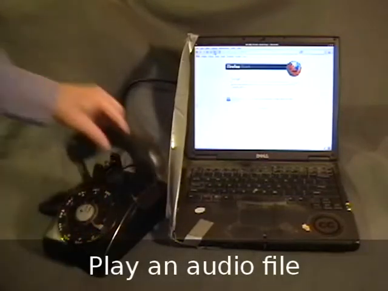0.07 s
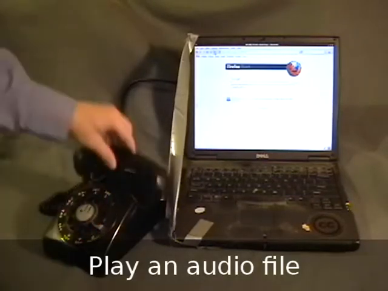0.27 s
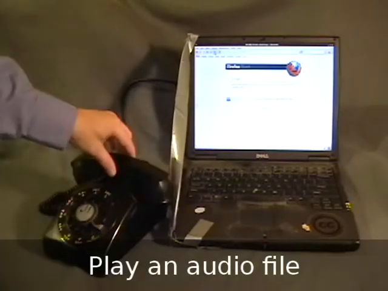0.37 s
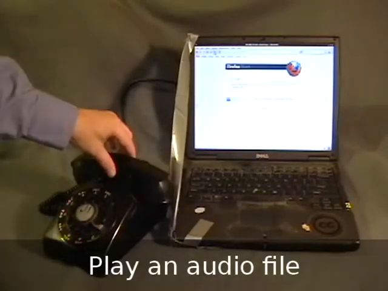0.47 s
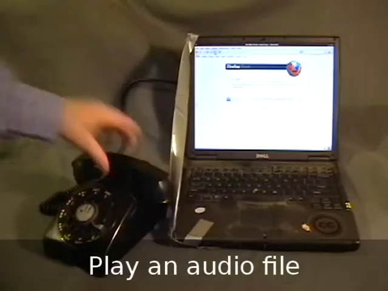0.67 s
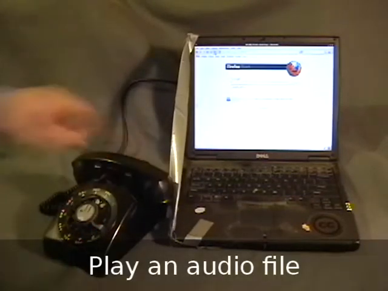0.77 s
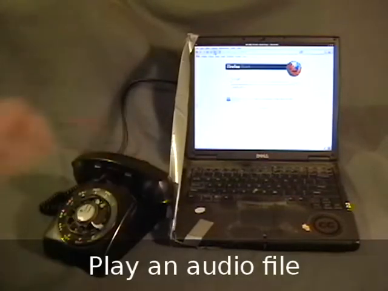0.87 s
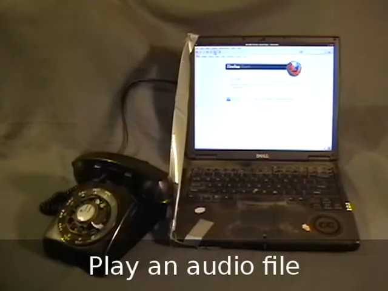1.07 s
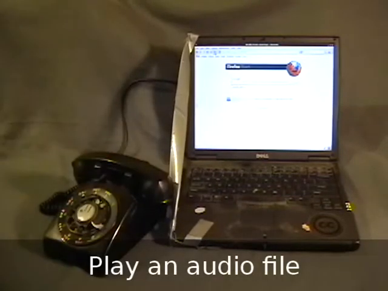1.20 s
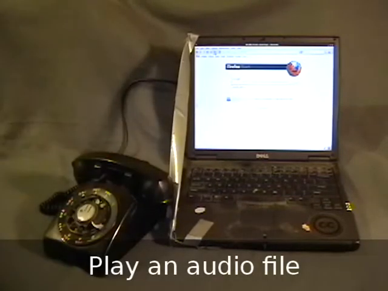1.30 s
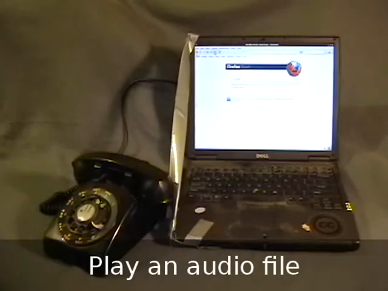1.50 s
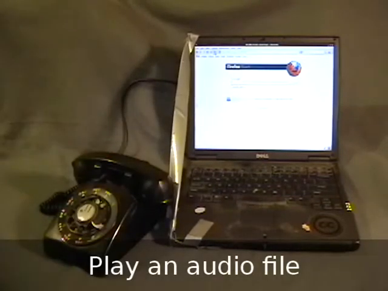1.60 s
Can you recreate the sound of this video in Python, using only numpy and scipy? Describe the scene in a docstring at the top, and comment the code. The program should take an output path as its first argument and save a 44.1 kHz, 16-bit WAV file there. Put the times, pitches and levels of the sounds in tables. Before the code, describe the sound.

A plastic telephone handset is hung up with two sharp, hollow clacks.

```python
"""A laptop fan whirs faintly in a quiet room, and a hand rustles as it lowers a plastic handset onto a
rotary desk telephone. One end lands, then the other: two hollow clacks, each a sharp crack that sets the
plastic ringing and thuds into the table, with small ticks between. The handset rocks into its seat with
soft knocks. Last, the fingers slide off it with a few slips and a tiny squeak, while the fan whirs on."""
import sys
import numpy as np
from scipy import signal
from scipy.fft import rfft, irfft
from scipy.io import wavfile
from scipy.ndimage import uniform_filter1d

SR = 44100
rng = np.random.default_rng(int(sys.argv[2]) if len(sys.argv) > 2 else 0)


def waveform_to_disk(signal):
    """Save audio, clipped to [-1, 1], as 16-bit WAV at the path in sys.argv[1]."""
    frames = np.transpose(np.atleast_2d(signal))
    scaled = np.clip(frames, -1, 1) * 32767
    samples = np.round(scaled).astype(np.int16)
    wavfile.write(sys.argv[1], SR, samples)


N = 72765
TIME = np.arange(N) / SR


def amp(db):
    """Turns decibels into a factor to multiply by."""
    return 10 ** (np.asarray(db) / 20)


def unit(x):
    """Scales a sound to an energy of one."""
    return x / np.sqrt(np.sum(x ** 2) + 1e-20)


def look_up(table, hz):
    """Reads between the rows of a table, along a logarithmic frequency axis."""
    row_hz, value = np.transpose(table)
    return np.interp(np.log(hz + 1), np.log(row_hz + 1), value)


def fade(t, fade_s):
    """Dies away. A fade time is always the time taken to fall by 60 dB."""
    return np.exp(-np.log(1000) * t / fade_s)


def add(mix, start_s, sound):
    """Mixes a sound in at its start time."""
    part = mix[:, round(start_s * SR):][:, :sound.shape[-1]]
    part += sound[..., :part.shape[1]]


def cut_bass(x, hz, order):
    """Weakens what lies below hz; a higher order cuts more steeply."""
    return signal.sosfilt(signal.butter(order, hz, "high", fs=SR, output="sos"), x)


def coloured(x, colour, tilt_db=0, size=4096):
    """Gives a sound a colour, its balance of low and high. A tilt above zero brightens it."""
    hz = abs(np.fft.fftfreq(size, 1 / SR))
    octaves = np.log2(np.maximum(hz, 300) / 1000)
    log_gain = np.log(amp(look_up(colour, hz) + tilt_db * octaves))
    response = np.exp(np.conj(signal.hilbert(log_gain)))  # nothing sounds ahead of the hit
    taps = np.fft.ifft(response).real[:size // 2]
    return signal.fftconvolve(np.atleast_2d(x), unit(taps)[None], axes=1)[:, :x.shape[-1]]


def stereo_noise(width):
    """Hiss for two channels; the smaller the width, the more alike they are."""
    mid, side = rng.standard_normal((2, N))
    return np.array([mid + width * side, mid - width * side])


def wobble(samples):
    """A random drift of about one either way, slower when smoothed over more samples."""
    return np.sqrt(N) * unit(uniform_filter1d(rng.standard_normal(N), size=samples))


# The rush of room air and fan. Each row: frequency in Hz, relative level in dB.
AIR_COLOUR = [(15, -33), (25, -20), (77, -9), (114, -3), (263, -5), (300, -11), (380, -2.5), (593, -8.5),
              (812, -4), (878, -10.5), (1480, -16.5), (1980, -15.5), (3250, -22), (10600, -32.5),
              (12500, -66)]
# How alike the air sounds left and right. Each row: frequency in Hz, likeness from 0 to 1.
AIR_LIKENESS = [(30, 0.3), (120, 0), (800, 0), (3000, 0.38), (10000, 0.94)]
# The fan's tones and hum. Each row: pitch in Hz, level in dB.
FAN_TONES = [(118.4, -73.5), (400, -77.5), (759, -72), (823.6, -76), (1949, -83)]


def fan_and_air(air_db=-57.5, wander_hz=3.54):
    """Air rushes steadily under the wavering tones of a small fan."""
    hz = np.fft.rfftfreq(N, 1 / SR)
    left, other = rfft(rng.standard_normal((2, N)))
    likeness = np.clip(look_up(AIR_LIKENESS, hz), 0, 1)
    right = likeness * left + np.sqrt(1 - likeness ** 2) * other
    rush = irfft(np.array([left, right]) * amp(look_up(AIR_COLOUR, hz)), N)
    out = amp(air_db) * np.sqrt(2 * N) * unit(rush)
    for tone_hz, db in FAN_TONES:
        pitch_hz = tone_hz + wander_hz * wobble(3000)
        out += amp(db) * np.sqrt(2) * np.sin(2 * np.pi * np.cumsum(pitch_hz) / SR)
    return out


# How the rustle of the hand swells and sinks. Each row: time in seconds, level in dB.
RUSTLE_LEVELS = [(0, -63.5), (0.058, -61), (0.11, -64.5), (0.6, -66.5), (0.7, -73), (0.915, -68),
                 (0.93, -61), (0.975, -58), (1.005, -55.5), (1.04, -58), (1.1, -67), (1.25, -72)]
# The colour of rubbing. Each row: frequency in Hz, relative level in dB.
RUB_COLOUR = [(150, -12.5), (420, -3.5), (650, 1.5), (900, -2.5), (1400, -1.5), (1680, 1.5), (2000, -4.5),
              (4500, -7.5), (10000, -11.5), (13000, -24.5)]


def hand_rustle():
    """Sleeve and skin rub as the hand moves, loudest as it slides off the plastic."""
    times, levels_db = np.transpose(RUSTLE_LEVELS)
    loudness = amp(np.interp(TIME, times, levels_db, -np.inf, -np.inf))
    return coloured(stereo_noise(width=0.27), RUB_COLOUR) * loudness


def crack(fade_s, rise_s=0.00076, size=4096):
    """A hit wakes many short vibrations in a plastic shell, heard as one sharp burst."""
    t = TIME[:size]
    shape = fade(t, fade_s)
    burst = rng.standard_normal(size) * shape
    for _ in range(3):  # even out the frequencies while keeping the burst short
        spectrum = rfft(burst)
        burst = irfft(spectrum / (abs(spectrum) + 1e-9)) * np.minimum(1, 10 * shape)
    return np.pad(unit(burst * np.minimum(t / rise_s, 1)), (0, N - size))


# Echoes of the crack. Each row: delay in seconds, level in dB compared with the crack.
NEAR_ECHOES = [(0.0032, -30.5), (0.0062, -9), (0.0148, -12.5)]


def echoed(x):
    """The sound bounces off the laptop and the wall close by."""
    out = x.copy()
    for delay_s, db in NEAR_ECHOES:
        add(out, delay_s, amp(db) * x)
    return out


# How long the dense ring lasts. Each row: frequency in Hz, fade time in seconds before stretching.
RING_FADES = [(100, 0.65), (450, .19), (1400, 0.18), (3500, 0.22), (8000, 0.12)]


def dense_ring(stretch, rise_s=0.0062):
    """Housing and nearby surfaces ring at so many pitches that they blur; the treble dies first."""
    hz, t, spectrum = signal.stft(stereo_noise(width=0.15), SR, nperseg=256)
    fade_s = stretch * look_up(RING_FADES, hz)[:, None]
    _, tail = signal.istft(spectrum * fade(t, fade_s), SR, nperseg=256)
    tail = cut_bass(tail[:, :N], hz=220, order=1)
    swell = (1 - np.exp(-TIME / rise_s)) ** 2
    return np.sqrt(2) * unit(tail * swell)


def struck(tones, rise_s, opposed=False):
    """A push starts all of an object's own tones at once; if opposed, every other one is flipped."""
    out = np.zeros((2, N))
    for k, (hz, db, fade_s) in enumerate(tones):
        skew = 0.15 * rng.standard_normal() * np.array([[1], [-1]])  # left and right slightly out of step
        sign = (-1) ** (k * opposed)
        out += sign * amp(db) * fade(TIME, fade_s) * np.sin(2 * np.pi * hz * TIME + skew)
    return out * np.minimum(TIME / rise_s, 1)


# The tones of the hollow handset and housing. Each row: pitch in Hz, fade time in seconds without
# the hand's grip, then a level in dB for each kind of blow: first landing, second landing, settling.
HOLLOW_TONES = [(228, .13, -26.5, -37, -39.5), (281.8, .3, -51.5, -38, -55), (338, 0.45, -47, -37.5, -54.5),
                (384.3, 0.22, -25, -18, -43.5), (449.9, 0.15, -24, -15, -39),
                (508.3, 0.17, -20.5, -20, -44), (626, 0.12, -25, -46, -46.5),
                (730, 0.03, -11.5, -16.5, -37), (867, 0.041, -18.5, -21.5, -59),
                (1021, 0.15, -33.5, -22.5, -50.5), (1066, 0.22, -33, -35.5, -54),
                (1130, 0.15, -44, -30.5, -57), (1420, 0.057, -20.5, -23.5, -64),
                (1724, 0.16, -33, -39.5, -50.5), (1935, 0.064, -30, -27.5, -63),
                (2075, 0.12, -46, -28.5, -75), (3218, 0.042, -18, -20, -63), (3443, 0.088, -29.5, -34, -60)]
# So small a body gives off little bass. One limit in Hz for each kind of blow, in the same order.
BASS_LIMITS_HZ = [199, 283, 190]
SECOND_LANDING, SETTLING = 1, 2
HARD_RISE_S, GRIP_S = 0.00073, 0.12


def hollow_body(blow, rise_s, favoured_hz=450, fall_db=0):
    """The hollow telephone rings with tones that depend on where it is hit; the hand chokes them."""
    tones = [(hz, levels[blow] - fall_db * abs(np.log2(hz / favoured_hz)), fade_s)
             for hz, fade_s, *levels in HOLLOW_TONES]
    grip = np.exp(-(TIME / GRIP_S) ** 2)
    ringing = struck(tones, rise_s, opposed=blow != SECOND_LANDING)
    return cut_bass(ringing * grip, BASS_LIMITS_HZ[blow], order=3)


# The two ends landing. Each row: start in seconds, crack level in dB, crack fade time in seconds,
# dense ring level in dB, stretch factor for the ring's fade time, left minus right in dB.
LANDINGS = [(0.2026, 5.5, 0.018, 3, 0.96, 0.5), (0.3001, 8.5, 0.02, 3.5, 0.85, 0)]
# One list for the colour of each landing. Each row: frequency in Hz, relative level in dB.
LANDING_COLOURS = [
    [(50, -41), (150, -41), (230, -23), (330, -12), (520, 4), (800, -3.5), (1100, -3.5), (1450, -6.5),
     (2650, -6), (3300, -11), (5200, -7), (5900, -24), (6700, -8), (8300, -10.5), (9100, -8),
     (10300, -19.5), (13000, -71.5)],
    [(50, -60.5), (170, -24), (290, -16.5), (470, 3.5), (600, -10), (950, -2.5), (1350, -9), (1950, -5.5),
     (2500, -16), (3400, -13.5), (4300, -19), (5200, -17.5), (5700, -23.5), (6800, -17.5), (7600, -31),
     (9000, -20.5), (10200, -97)],
]


def clacks():
    """Each end of the handset hits the cradle: a crack, a dense ring and hollow tones."""
    out = np.zeros((2, N))
    for blow, (start_s, crack_db, fade_s, ring_db, stretch, left_db) in enumerate(LANDINGS):
        snap = amp(crack_db) * echoed(crack(fade_s)[None])
        shell = coloured(snap + amp(ring_db) * dense_ring(stretch), LANDING_COLOURS[blow])
        balance = amp([[left_db / 2], [-left_db / 2]])
        add(out, start_s, (shell + hollow_body(blow, HARD_RISE_S)) * balance)
    return out


# The table's low tones. Each row: pitch in Hz, relative level in dB, fade time in seconds.
TABLE_TONES = [(67, -5.5, 0.19), (102, -9, 0.52), (120.3, 5.5, 0.076)]


def table_thuds():
    """Each landing pushes softly through the cloth into the table."""
    out = np.zeros((2, N))
    for start_s, db in [(0.219, -44.5), (0.301, -39)]:
        add(out, start_s, amp(db) * struck(TABLE_TONES, rise_s=0.01))
    return out


# Light ticks. Each row: start in seconds, level in dB, fade time in seconds, tilt in dB per octave,
# then the levels of the dense ring and of the prongs, both in dB compared with the tick.
PLASTIC_TICKS = [(0.2305, -1, 0.019, 2.5, -14, 0.5), (0.2742, -5.5, 0.014, -2.5, 0.5, 0.5),
                 (0.2901, -15, .025, -4, -9, 1), (0.4722, -17.5, 0.021, -0.5, -2.5, -11),
                 (0.5058, -19, 0.024, -2.5, -2, -7)]
# The colour of a tick. Each row: frequency in Hz, relative level in dB.
PLASTIC_COLOUR = [(50, -66.5), (150, -11.5), (500, -1.5), (1100, -4), (1850, 3.5), (2500, -5.5),
                  (3350, 0.5), (4100, -5.5), (5000, 3), (6000, -3.5), (8200, 0), (9500, -20), (11000, -26),
                  (13000, -61)]
# The tones of the cradle's prongs. Each row: pitch in Hz, relative level in dB, fade time in seconds.
PRONG_TONES = [(1863, -29, 0.036), (3244, -27, 0.052), (3366, -29, 0.048), (4890, -36, 0.1),
               (5030, -40, 0.02), (7780, -38.5, 0.11)]


def ticks():
    """Plastic taps plastic as the handset shifts, and the cradle's small prongs ring."""
    out = np.zeros((2, N))
    for start_s, db, fade_s, tilt_db, ring_db, prong_db in PLASTIC_TICKS:
        tap = crack(fade_s) + amp(ring_db) * dense_ring(stretch=1)
        prongs = amp(prong_db) * struck(PRONG_TONES, HARD_RISE_S)
        add(out, start_s, amp(db) * (coloured(tap, PLASTIC_COLOUR, tilt_db) + prongs))
    return out


# Soft knocks. Each row: start in seconds, level in dB, rise time in seconds, favoured pitch in Hz,
# drop in dB for each octave away from that pitch.
KNOCKS = [(0.3675, 14.5, 0.0012, 536, 44), (0.480, 0.5, 0.0046, 378, 32), (0.527, 1.5, 0.0017, 430, 2.5),
          (0.594, -9.5, 0.01, 410, 10)]


def settling_knocks():
    """The handset rocks in its seat; each knock favours the hollow tones near one pitch."""
    out = np.zeros((2, N))
    for start_s, db, rise_s, favoured_hz, fall_db in KNOCKS:
        add(out, start_s, amp(db) * hollow_body(SETTLING, rise_s, favoured_hz, fall_db))
    return out


# Small slips of the fingers. Each row: start in seconds, level in dB, tilt in dB per octave.
FINGER_SLIPS = [(0.9254, -28.5, -4), (0.952, -33, -4.5), (1, -35, 4), (1.0503, -37.5, 2.5)]


def finger_slips():
    """Skin slips on the plastic in small jerks as the fingers leave."""
    out = np.zeros((2, N))
    for start_s, db, tilt_db in FINGER_SLIPS:
        slip = crack(fade_s=0.025) + dense_ring(stretch=0.27)
        add(out, start_s, amp(db) * coloured(slip, RUB_COLOUR, tilt_db))
    return out


def squeak(peak_s=1.002, hz=1605, db=-54, waver=0.022):
    """A fingertip sticks and slips as it lets go, making a brief, unsteady tone."""
    pitch_hz = hz * (1 + waver * wobble(150))
    tone = np.sin(2 * np.pi * np.cumsum(pitch_hz) / SR)
    swell = np.exp(-abs(TIME - peak_s) / 0.014)
    return amp(db) * tone * swell


# How much louder the telephone is on the left. Each row: frequency in Hz, left minus right in dB.
LEFT_LEAN = [(60, 2.5), (380, -2), (650, 3.2), (1200, 3.5), (2200, 3.5), (4000, 0.5), (7500, 1.8)]


def leftward(x):
    """The telephone stands a little to the left."""
    lean_db = look_up(LEFT_LEAN, np.fft.rfftfreq(2 * N, 1 / SR))
    balance = amp(np.array([lean_db, -lean_db]) / 2)
    return irfft(rfft(x, 2 * N) * balance)[:, :N]


def room(x, db=-29, fade_s=0.8):
    """The room answers with a faint, dull wash of echoes."""
    colour = [(100, -12), (250, -10), (450, 3), (2000, -2), (8000, -9.5)]  # each pair: Hz, dB
    tail = coloured(stereo_noise(width=0.63) * fade(TIME, fade_s), colour)
    return amp(db) * signal.fftconvolve(x, np.sqrt(2) * unit(tail), axes=1)[:, :N]


def scene():
    """Telephone and hand sound close by, over the room's echoes and the fan."""
    handset = clacks() + ticks() + settling_knocks() + table_thuds()
    hand = hand_rustle() + finger_slips() + squeak()
    near = handset + hand
    return leftward(near) + room(near) + fan_and_air()


def record(dry, low_hz=45, high_hz=13500):
    """The microphones lose the deep bass; then the highest treble is cut off."""
    heard = cut_bass(dry, low_hz, order=2)
    treble_cut = signal.firwin(511, high_hz, window=("kaiser", 9), fs=SR)
    return signal.oaconvolve(heard, treble_cut[None], "same")


dry = scene()
out = record(dry)
waveform_to_disk(out)
```